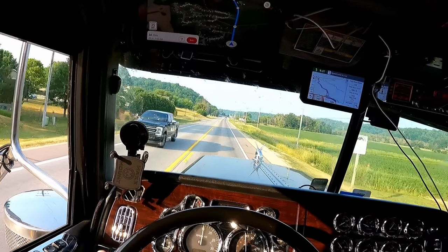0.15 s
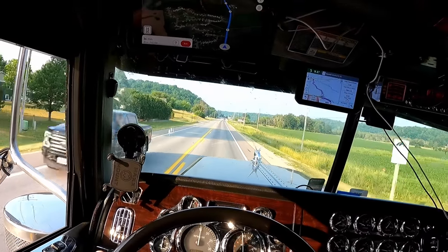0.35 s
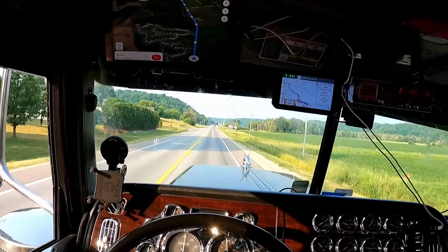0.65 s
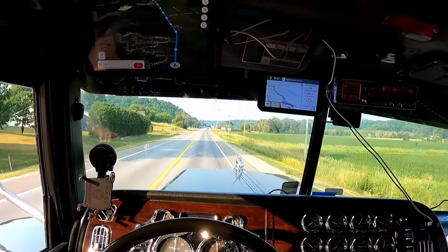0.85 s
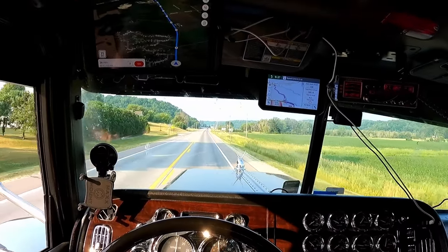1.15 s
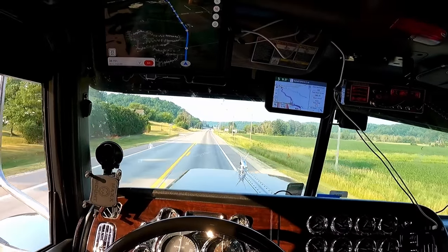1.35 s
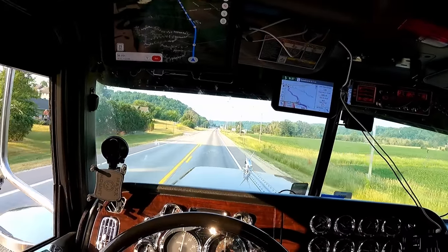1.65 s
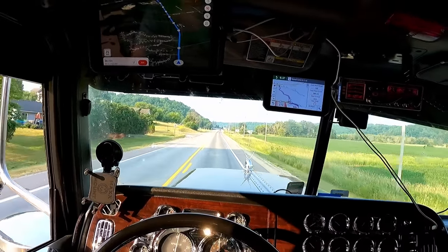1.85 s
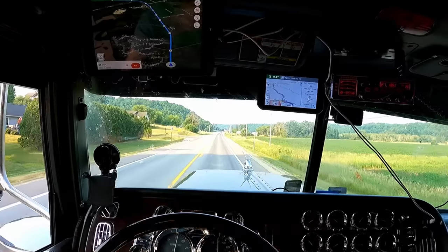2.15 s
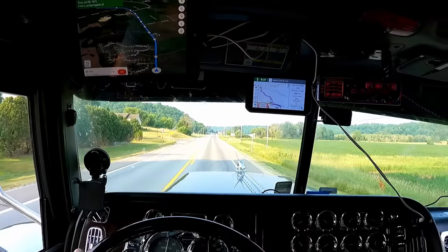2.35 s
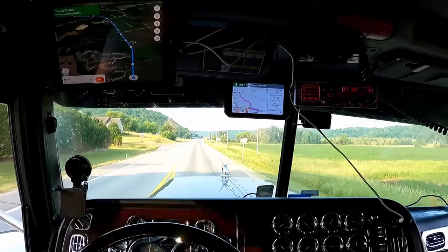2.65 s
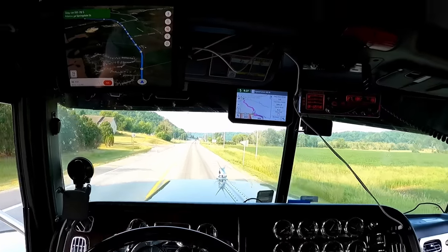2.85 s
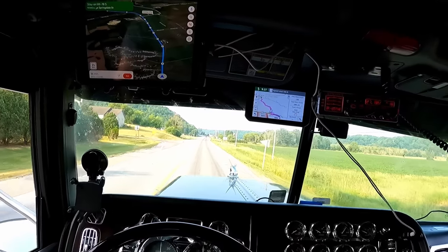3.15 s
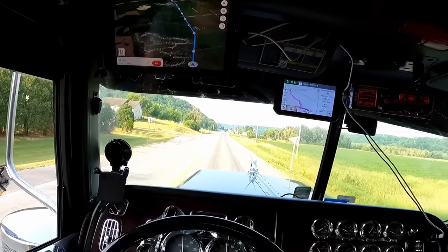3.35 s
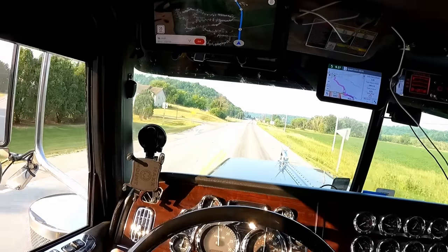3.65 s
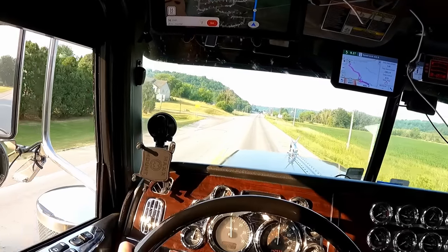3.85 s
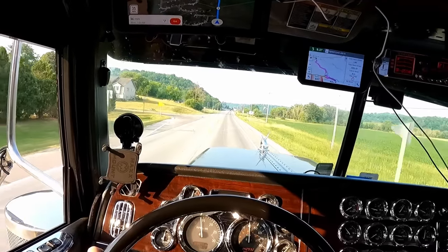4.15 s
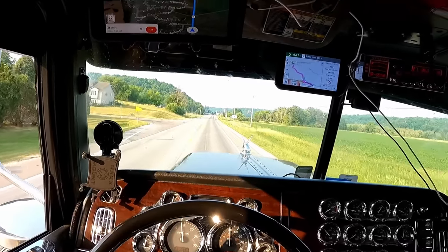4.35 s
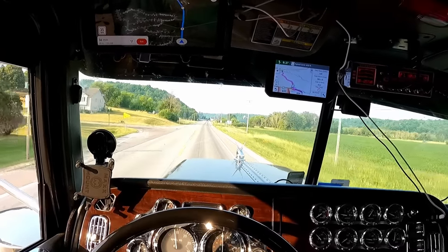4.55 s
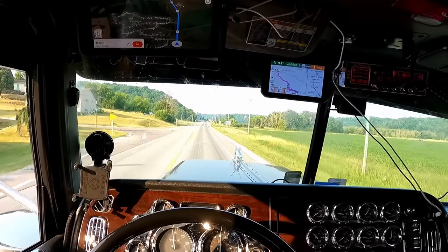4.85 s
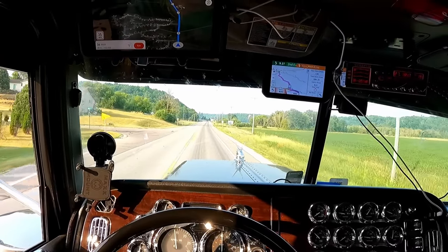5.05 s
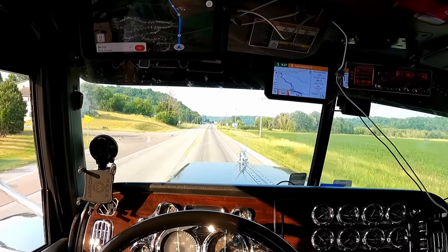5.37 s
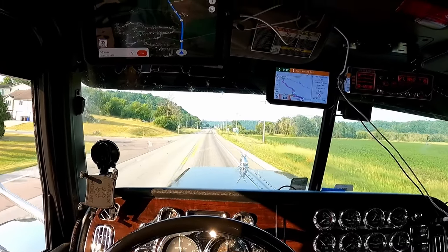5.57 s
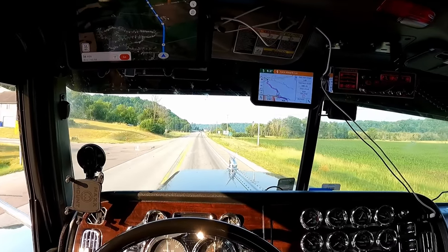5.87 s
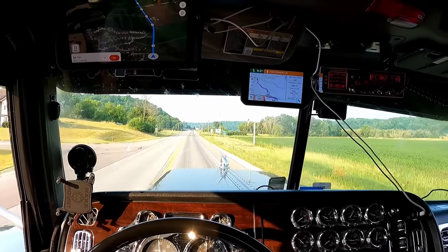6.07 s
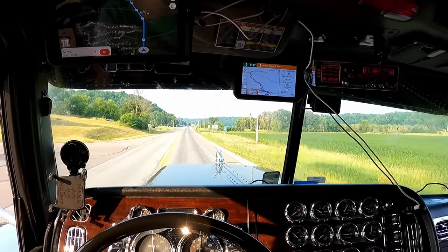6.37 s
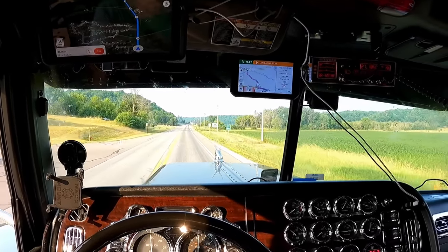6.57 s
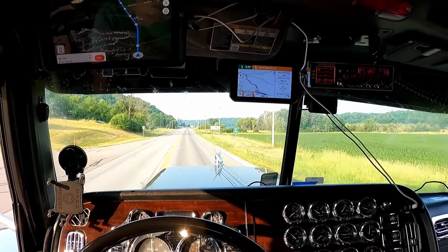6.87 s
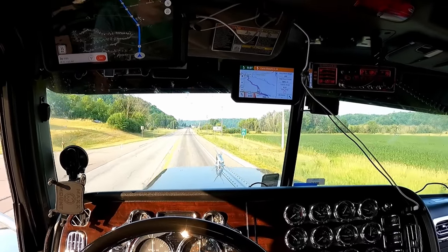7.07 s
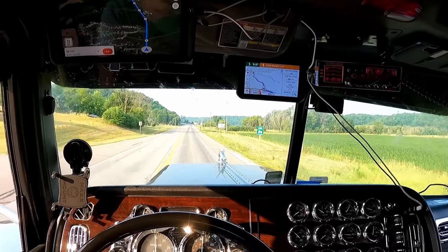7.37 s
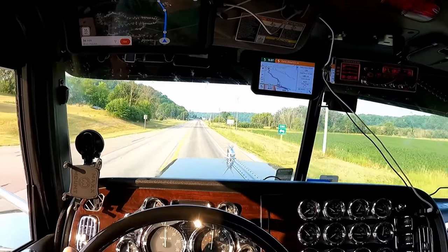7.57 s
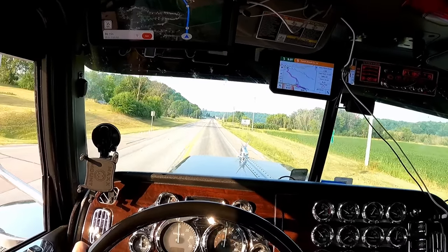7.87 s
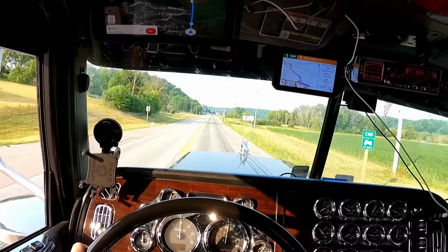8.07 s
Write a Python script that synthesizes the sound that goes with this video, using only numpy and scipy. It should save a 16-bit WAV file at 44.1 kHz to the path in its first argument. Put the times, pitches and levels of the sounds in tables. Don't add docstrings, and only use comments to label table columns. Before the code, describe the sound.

In-cab stereo sound of a heavy six-cylinder diesel truck on a country road, window ajar. From 0 to 1.7 s the engine pulls hard: deep exhaust boom, chassis rumble, rough throbbing growl and combustion roar, pitch edging upward while a thin turbo whistle climbs quickly. At about 0.75 s a pickup whooshes by on the left; a short sharp air rush follows at 1.15. Around 2 s load comes off with a light clatter, growl fades and the whistle slides down. Engine pitch sinks until 3.4 s, with a breathy boost howl peaking near 3.1. Around 3.6 to 4 s the next gear bites with shudder and clatter; boom and growl swell from 4.5, whistle rising again to 5.8. Growl eases at 6.6 to 7 under strong boom, then builds to the end at 8.2. Small wind thumps bump either channel at scattered moments, clustered near 1.8 and 8 s.

```python
import sys
import numpy as np
from scipy import signal
from scipy.fft import rfft, irfft
from scipy.io import wavfile
from scipy.ndimage import uniform_filter1d, map_coordinates

SR = 44100
rng = np.random.default_rng(int(sys.argv[2]) if len(sys.argv) > 2 else 0)


def bounce(signal):
    frames = np.transpose(np.atleast_2d(signal))
    limited = np.clip(frames, -1, 1)
    pcm = np.round(limited * 32767).astype(np.int16)
    wavfile.write(sys.argv[1], SR, pcm)


def voltage_ratio(decibels):
    exponent = np.asarray(decibels, float) / 20
    return 10 ** exponent


N = 362502


def evened(x):
    return x / np.sqrt(np.mean(x ** 2) + 1e-20)


def read(points, hz):
    f, value = np.transpose(points)
    return np.interp(np.log(hz + 1), np.log(f + 1), value)


def curves(rows):
    s, *columns = np.transpose(rows)
    return [np.interp(np.arange(N) / SR, s, c) for c in columns]


def drift(per_s):
    knots = rng.standard_normal(400)
    return map_coordinates(knots, [np.arange(N) / SR * np.clip(per_s, 0, 45)], order=3)


def swell(s, half, height):
    return height * np.exp(-.5 * ((np.arange(N) / SR - s) / half) ** 2)


def swells(rows):
    return sum(swell(*row) for row in rows)


def lift_db(peaks, hz):
    return 10 * np.log10(1 + sum(voltage_ratio(2 * db) / (1 + (2 * (hz - f) / width) ** 2) ** 2
                                 for f, width, db in peaks))


# (time [s], level [dB])
ENGINE_LOAD = [(0, -25.5), (.2, -22), (1.4, -21), (1.8, -25), (2.2, -31.5), (3.4, -33), (3.8, -33),
               (4.1, -30), (4.6, -21), (5.2, -19), (5.8, -19.5), (6.6, -28), (7, -29), (7.5, -25.5),
               (7.8, -22.5), (8.22, -19.5)]
# (time [s], level [dB], octave over the firing tone [dB])
EXHAUST_BOOM = [(0, -12, -22), (.4, -12, -18.5), (.8, -16, -18.5), (1.25, -13, -17.5), (2, -14, -13.5),
                (2.3, -19, -14), (2.6, -20.5, -4.5), (3.5, -22, 1), (3.75, -15, -7.5), (4.25, -13.5, -3),
                (4.6, -12.6, 12.5), (4.95, -14.5, 4.5), (5.4, -15.5, 3), (6.1, -11, 16), (6.7, -11, 18.5),
                (7.2, -15, 4.5), (7.5, -14.5, 3), (8.22, -13, 6)]
FULL_LOAD_DB = -22


def level_db(usual_db, per_load, per_boom):
    over_load = curves(ENGINE_LOAD)[0] - FULL_LOAD_DB
    over_boom = curves(EXHAUST_BOOM)[0] + 14
    return usual_db + per_load * over_load - per_boom * over_boom


# (frequency [Hz], likeness [0 to 1])
LIKENESS = [(30, .996), (150, 1), (300, 0.76), (600, 0.85), (1200, 0.75), (2500, 0.61), (5000, 0.67),
            (10000, 0.44)]
# (frequency [Hz], difference [dB])
LEFT_LOUDER = [(60, 0.5), (160, 1.0), (430, 2), (1170, 4), (3150, 2.0), (8470, 3)]
# (frequency [Hz], phase [radians])
LEFT_LEADS = [(20, .03), (150, .1), (520, -.4), (950, -.4), (1210, -.55), (2670, -.85), (4740, 0),
              (8610, 0)]


def ports(hz):
    half = voltage_ratio(read(LEFT_LOUDER, hz) / 2) * np.exp(.5j * read(LEFT_LEADS, hz))
    return np.array([half, 1 / half])


def noise(shape_db, patchy_db, size=1024):
    frames, hz = 4 * N // size + 5, np.fft.rfftfreq(size, 1 / SR)[:, None]
    a, b, c, d, patches = rng.standard_normal((frames, len(hz), 5)).T
    patches = uniform_filter1d(patches, size=10, axis=0)
    patches = evened(uniform_filter1d(patches, size=12, axis=1))
    same = np.clip(read(LIKENESS, hz), -1, 1)
    left = a + 1j * b
    right = same * left + np.sqrt(1 - same ** 2) * (c + 1j * d)
    z = np.array([left, right]) * ports(hz)
    z *= voltage_ratio(shape_db(hz, np.arange(frames) * size / 4 / SR) + patchy_db * patches)
    return evened(signal.istft(z, nperseg=size, noverlap=3 * size // 4)[1][:, :N])


def tone(turns, hz, waver_db, per_s, skew=0):
    heard = ports(hz) * np.exp(1j * skew * rng.standard_normal(2))
    strength = np.sqrt(2) * voltage_ratio(waver_db * drift(per_s))
    return strength * (heard[:, None] * np.exp(2j * np.pi * turns)).real


def whistle(hz, width):
    r = np.exp(-np.pi * width / SR)
    z = rng.standard_normal((3, N)) + 1j * rng.standard_normal((3, N))
    z = signal.lfilter([1], np.convolve([1, -r], [1, -r]), z[0] + 0.36 * z[1:])
    return evened((ports(hz) * z * np.exp(2j * np.pi * np.cumsum(hz) / SR)).real)


# (time [s], half length [s], level [dB])
THIRD_IN_STACK = [
    (1.9, .12, -8),
    (2.85, 0.29, -3),
    (3.85, .25, 8),
    (4.55, 0.24, -18),
    (5.3, 0.21, 9),
    (8.05, 0.18, -10),
]
# (time [s], half length [s], level [dB])
FOURTH_IN_STACK = [
    (2.5, 0.58, -3),
    (4.6, 0.17, -9),
    (5.25, 0.3, 2),
    (5.9, 0.27, -9),
]


def exhaust_boom(firings):
    boom_db, octave_db = curves(EXHAUST_BOOM)
    octave_db = octave_db + swell(.775, half=.2, height=19)
    firing_db = boom_db - 10 * np.log10(1 + voltage_ratio(2 * octave_db))
    third_db = level_db(-31, per_load=.73, per_boom=.1) + swells(THIRD_IN_STACK)
    fourth_db = level_db(-33.5, per_load=.86, per_boom=.1) + swells(FOURTH_IN_STACK)
    levels = firing_db, firing_db + octave_db, third_db, fourth_db
    return sum(voltage_ratio(db) * tone(k * firings - k ** 2 / 9, k * 74, .6, 14, .008 * k ** 3)
               for k, db in enumerate(levels, 1))


def crank_line(firings, multiple, skew):
    return tone(multiple * firings / 3 + rng.random(), multiple * 74 / 3, 1.8, 4, skew)


# (multiple of crank turn rate [1], lower gear [dB], higher gear [dB])
SHAKE_LINES = [(4, -24.5, -13), (4.5, -0.5, -10), (5, -4.5, -9.5), (7, -4.5, -14), (8, -16, -15)]
# (time [s], frequency [Hz])
DRIVELINE_SHUDDER = [(0, 43.5), (1.8, 45), (2.6, 44.5), (3.4, 45.5), (5, 45.5), (8.22, 48.5)]
# (frequency [Hz], level per Hz [dB])
CHASSIS_NOISE = [(12, -17.5), (24, -15.5), (45, -4.5), (62, -19), (115, -11.5), (185, -18.5), (230, -23.5),
                 (400, -65.5)]


def chassis_rumble(firings, higher):
    shake = sum(voltage_ratio(low_db + higher * (high_db - low_db)) * crank_line(firings, k, 0.022)
                for k, low_db, high_db in SHAKE_LINES)
    shudder = tone(np.cumsum(curves(DRIVELINE_SHUDDER)[0]) / SR, 45, 2.2, 5)
    shake += voltage_ratio(-0.7 + swell(3.64, half=.24, height=6.6)) * shudder
    rumble = voltage_ratio(1.4) * noise(lambda hz, s: read(CHASSIS_NOISE, hz), 0.24, size=4096)
    return voltage_ratio(level_db(-27, per_load=.058, per_boom=.73)) * (voltage_ratio(-3.0) * shake + rumble)


# (multiple of crank turn rate [1], lower gear [dB], higher gear [dB])
GROWL_LINES = [(10.12, -8.5, -9), (12.71, -4.5, -5.5), (14.07, -16, -10), (14.59, -2, -3.5),
               (15.16, 3.5, -14.5), (15.88, -2, -3), (16.3, -36, -3), (17.15, -19, -2.5), (17.42, -2, -2.5),
               (17.93, -6, -12.5), (18.93, -4, -11.5), (19.63, -7, -28), (20.1, -4, -3), (20.63, -7, -18),
               (21.87, -3, -7.5), (22.6, -20, -9.5), (23.56, -13, -9), (25, -16, -8), (27.6, -28, -11),
               (28.16, -12, -14.5)]
# (frequency [Hz], level per Hz [dB])
GROWL_COLOUR = [(150, -29), (230, 1), (300, -6.5), (390, -3.5), (500, -12), (580, -1), (700, -26.5),
                (1100, -53)]
# (frequency [Hz], width [Hz], level [dB])
CAB_RESONANCES = [(342, 24, 3), (386, 18.3, 2), (461.2, 13.7, 3), (523, 29, 3)]


def load_growl(firings, firing_hz, higher, knock):
    load_db = curves(ENGINE_LOAD)[0]
    lines = 0
    for k, low_db, high_db in GROWL_LINES:
        line_db = low_db + higher * (high_db - low_db) + lift_db(CAB_RESONANCES, k * firing_hz / 3)
        lines = lines + voltage_ratio(line_db) * crank_line(firings, k, 0.24)
    lines = voltage_ratio(-0.5 + 0.22 * (load_db - FULL_LOAD_DB)) * lines / np.sqrt(len(GROWL_LINES))
    between = voltage_ratio(-10.5) * knock * noise(lambda hz, s: read(GROWL_COLOUR, hz), 1.2, size=2048)
    return voltage_ratio(load_db) * (lines + between)


# (frequency [Hz], level per Hz [dB])
COMBUSTION_ROAR = [(150, -29.5), (250, 0), (500, 0.5), (700, -5.5), (920, -0.5), (1150, -4.5), (1400, -7),
                   (1900, -9.5), (2400, -13), (3200, -18.5), (6000, -43.5)]
# (frequency [Hz], width [Hz], level [dB])
CAB_PANELS = [(908, 63, 3.5), (1031.6, 38, 2), (1121, 26, 4.5), (1237, 36, -2), (1454, 31, -4.5),
              (1592, 55, -5), (1724, 37, -0.5), (1855, 34, -2), (1985, 69, -5), (2123, 63, -12.5),
              (4350, 55, -31)]
# (time [s], half length [s], level [dB])
GEAR_CLATTER = [
    (2.1, .25, 2.5),
    (3.95, 0.36, 4.9),
]


def combustion(knock):
    roar_db = level_db(-31.5, per_load=.48, per_boom=.32) + swells(GEAR_CLATTER)
    roar = voltage_ratio(2.33) * knock * noise(lambda hz, s: read(COMBUSTION_ROAR, hz), 1.26)

    def ringing(f, s):
        return 10 * np.log10(sum(voltage_ratio(2 * db) / (1 + (2 * (f - hz) / width) ** 2) ** 2
                                 for hz, width, db in CAB_PANELS))

    panels_db = -7.0 + 0.44 * (curves(ENGINE_LOAD)[0] - roar_db)
    panels = voltage_ratio(panels_db) * noise(ringing, 1.13, size=2048)
    return voltage_ratio(roar_db) * (roar + panels)


# (time [s], firing rate [Hz])
ENGINE_SPEED = [(0.0, 75.7), (0.4, 76.8), (1.0, 77.7), (1.6, 79.3), (2.0, 80.1), (2.3, 79.7), (2.6, 77.2),
                (3.2, 68.3), (3.4, 67.3), (3.6, 67.8), (5.0, 68.9), (5.8, 70.1), (8.0, 73.1), (8.22, 73.7)]


def engine():
    firing_hz = curves(ENGINE_SPEED)[0]
    firings = np.cumsum(firing_hz * (1 + 0.0012 * drift(6))) / SR
    knock = 1 + 0.059 * np.cos(2 * np.pi * firings)
    shift_s = 3.3
    higher = uniform_filter1d(1. * (np.arange(N) > shift_s * SR), size=12000)
    out = exhaust_boom(firings) + chassis_rumble(firings, higher)
    return out + load_growl(firings, firing_hz, higher, knock) + combustion(knock)


# (time [s], compressor blade rate [Hz])
TURBO_SPEED = [(0.0, 6040.0), (0.3, 6340.0), (0.85, 7860.0), (1.2, 8370.0), (1.65, 8650.0), (2.0, 8540.0),
               (2.25, 8170.0), (2.7, 6210.0), (3.1, 5100.0), (3.65, 4060.0), (4.15, 3950.0), (4.55, 4720.0),
               (5.2, 6790.0), (5.75, 7840.0), (6.7, 7790.0), (7.6, 7030.0), (8.05, 7030.0), (8.22, 7260.0)]
# (frequency [Hz], level per Hz [dB])
INTAKE_HISS = [(1500, -31), (2600, 0.5), (3400, -1.5), (4200, -1), (5200, -1.5), (7500, -2.5),
               (9500, -16.5), (12000, -17.5), (15000, -48)]
# (frequency [Hz], width [Hz], level [dB])
AIR_BOX_RESONANCES = [(4090, 110, 5.5), (4840, 180, 12), (6770, 370, 8.5), (7040, 38, 5), (7220, 100, 5.5),
                      (7763, 54, 10.5), (8250, 200, 8.5)]
# (compressor blade rate [Hz], level [dB])
TURBINE_WHISTLE = [(4000, -48.5), (5500, -47), (6300, -50), (7300, -54), (8100, -61), (8500, -72)]


def turbo():
    t = np.arange(N) / SR
    hz = uniform_filter1d(curves(TURBO_SPEED)[0], size=8000)
    slewing = np.clip(abs(np.gradient(hz)) * SR / 3000, 0, 1)

    def hiss_db(f, s):
        limit_hz = 1.51 * np.interp(s * SR, np.arange(N), hz)
        return read(INTAKE_HISS, f) - 17 * np.maximum(np.log2((f + 1) / limit_hz), 0)

    intake_db = level_db(-39, per_load=.6, per_boom=.51) + 1.5
    intake = voltage_ratio(intake_db) * noise(hiss_db, 1.5, size=512)

    duct_hz = 4144 + swell(2.7, half=.45, height=500)
    duct_db = level_db(-50, per_load=1.1, per_boom=.25) + swell(3.13, half=.45, height=21)
    howl = voltage_ratio(duct_db) * whistle(duct_hz, 550)

    compressor_db = level_db(-50.5, per_load=.067, per_boom=.54) + lift_db(AIR_BOX_RESONANCES, hz)
    compressor_db += swell(4.56, half=.37, height=-5.5)
    core = .7 * whistle(hz, 55) + .7 * tone(np.cumsum(hz) / SR, 6000, 2, 12)
    core *= voltage_ratio(1.6 * drift(30) - 4 * slewing)
    blades = core + 0.71 * whistle(hz, 260) + (0.25 + 0.49 * slewing) * whistle(hz, 730)

    turbine_db = read(TURBINE_WHISTLE, hz)
    turbine_db += -12 * (t < 2.1)
    turbine_db += -15 * np.clip(2 * (t - 5.4), 0, 1)
    turbine = voltage_ratio(turbine_db) * whistle(1.435 * hz, 600)
    return intake + howl + voltage_ratio(compressor_db) * blades + turbine


# (time [s], peak level [dB], length [ms], port [0 left, 1 right])
WIND_PUFFS = [(.33, -22, 12, 0), (.43, -30, 12, 0), (1.722, -11, 4, 1), (1.776, -13, 2.1, 0),
              (1.789, -11, 2.9, 1), (1.812, -18, 5.1, 1), (2.4, -22, 14, 1), (3.662, -7, 2.3, 0),
              (3.69, -19, 7, 1), (4.221, -12, 3.2, 1), (4.821, -16, 4.3, 1), (5.38, -25, 12, 0),
              (8.006, -15, 5, 1), (8.013, -12, 2.7, 0), (8.024, -7, 3.4, 0), (8.049, -12, 4.6, 0),
              (8.075, -15, 10, 1)]


def wind():
    t, out = np.arange(-2000, 2000) / SR, np.zeros((2, N))
    for s, db, ms, port in WIND_PUFFS:
        u = t / (ms / 2000)
        push = (1 - .7 * u ** 2) * np.exp(-u ** 2 / 2)
        part = out[int(port > .5), round(s * SR) - 2000:][:len(t)]
        part += voltage_ratio(db) * push[:len(part)]
    return out


# (time [s], level [dB], half length [s], centre frequency [Hz])
AIR_RUSHES = [
    (0.746, -32.5, 0.073, 1770),
    (1.153, -38, .012, 4970),
    (2.56, -47, 0.03, 4000),
    (4.698, -48, 0.23, 8000),
    (5.748, -41, 0.23, 3500),
]


def window():
    out = np.zeros((2, N))
    for s, db, half, hz in AIR_RUSHES:
        air = noise(lambda f, _: -8.5 * abs(np.log2((f + 30) / hz)), 1.5, size=512)
        out += voltage_ratio(db) * swell(s, half, 1) * air
    return out


def scene():
    return engine() + turbo() + wind() + window()


def band_limit(x):
    return signal.sosfilt(signal.butter(12, 15000, fs=SR, output="sos"), x)


# (frequency [Hz], level [dB])
MICROPHONE_COLOUR = [(20, 0), (10000, -0.5), (12000, -5), (13500, -4.5), (15000, -24), (22050, -41)]


def record(dry):
    colour = voltage_ratio(read(MICROPHONE_COLOUR, np.fft.rfftfreq(N, 1 / SR)))
    dulled = irfft(rfft(dry) * colour, N)
    squeezed = 1.7 * np.tanh(dulled / 1.7)
    return band_limit(squeezed)


dry = scene()
out = record(dry)
bounce(out)
```